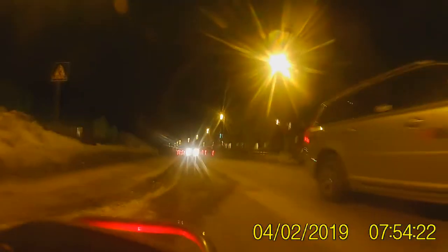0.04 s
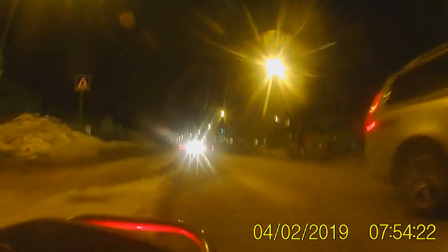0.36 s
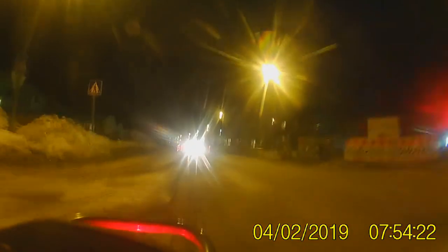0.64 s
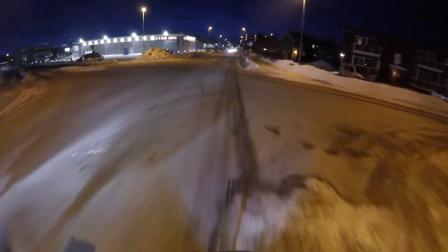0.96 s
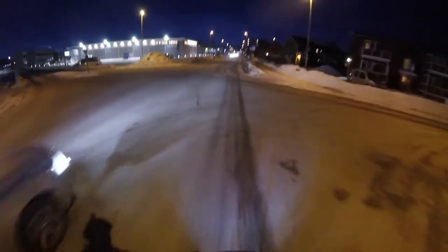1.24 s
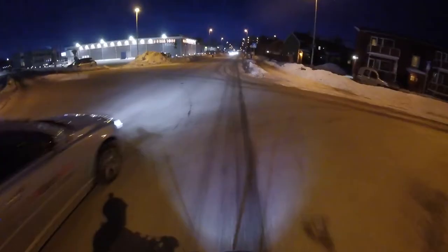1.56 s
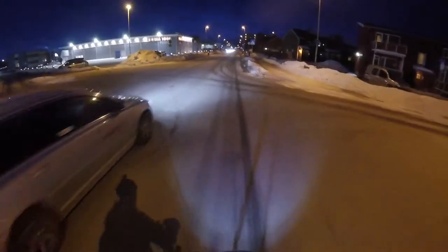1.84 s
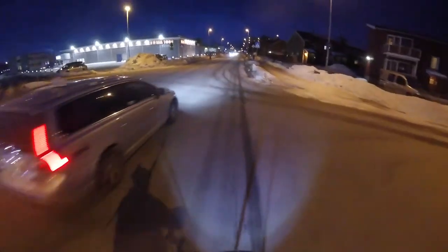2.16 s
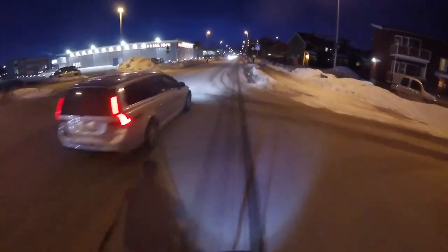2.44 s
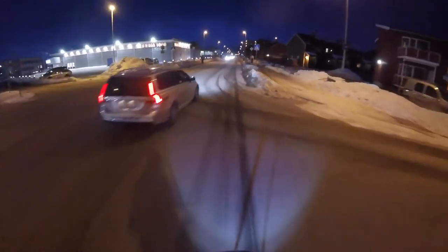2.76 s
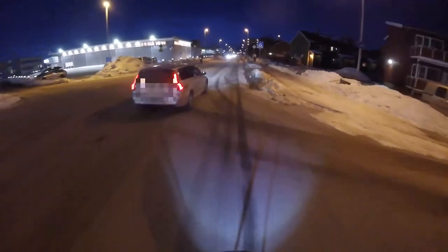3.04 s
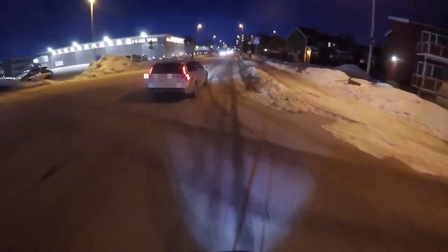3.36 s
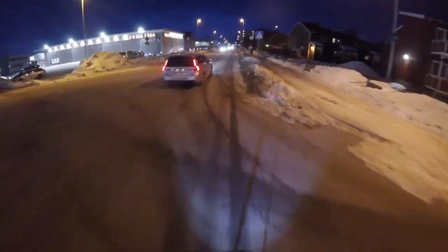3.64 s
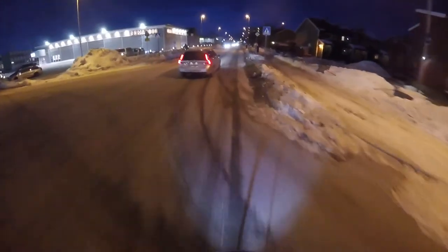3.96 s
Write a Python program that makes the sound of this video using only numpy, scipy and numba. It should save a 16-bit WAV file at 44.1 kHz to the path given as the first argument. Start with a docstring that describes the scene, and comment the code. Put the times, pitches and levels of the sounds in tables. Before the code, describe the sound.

Strong wind overloads a bicycle's microphone with harsh crackling and faint whistling. After about a second it switches abruptly to a deep, gusty rumble, with a thin hiss and a car's tyres rolling past on a snowy road.

```python
"""Night cycling on a snowy road

Two scenes are heard from a bicycle, one straight after the other. In the first, wind overloads a small
microphone: the signal slams between its limits and crackles, and the housing whistles and squeaks.
In the second, at another microphone, turbulent wind rumbles and gusts, a car's tyres roar past,
and rushing air hisses in two narrow resonances of a camera case."""
import sys
import numpy as np
from scipy.fft import rfft, irfft, next_fast_len
from scipy.io import wavfile
from scipy.ndimage import uniform_filter1d, map_coordinates
from numba import njit

SR = 44100
rng = np.random.default_rng(int(sys.argv[2]) if len(sys.argv) > 2 else 0)


def log_audio(samples):
    """Write samples as a 16-bit WAV file to the path given in sys.argv[1]."""
    # one column per channel
    frames = np.atleast_2d(samples).T
    # limit to full scale, then quantise
    limited = np.clip(frames, -1, 1)
    pcm = np.round(limited * 32767).astype(np.int16)
    wavfile.write(sys.argv[1], SR, pcm)


N = 176400
TIME = np.arange(N) / SR

# spectrum of the microphone's crackle and fizz: f/Hz, relative level/dB
CRACKLE_SPECTRUM = [(300, 7.5), (2000, -1.5), (2900, 4), (4200, 3.5), (5500, -1.5), (9500, -1),
                    (13000, -16), (16000, -19)]


def amp(db):
    """Amplitude ratio of a level in decibels."""
    return 10 ** (np.asarray(db) / 20)


def unit(x):
    """Normalisation to rms 1."""
    return x / np.sqrt(np.mean(x ** 2) + 1e-20)


def envelope(points):
    """Gain per sample, interpolated between points (t/s, level/dB)."""
    return amp(np.interp(TIME, *np.transpose(points)))


def wobble(rate):
    """Smooth random modulation: a spline through rate Gaussian knots a second."""
    return map_coordinates(rng.standard_normal(4000), [TIME * rate], mode="mirror")


def filtered(x, response):
    """Linear filtering: the spectrum of x is multiplied by a frequency response."""
    size = next_fast_len(N + SR // 2)
    return irfft(rfft(x, size) * response(np.fft.rfftfreq(size, 1 / SR)), size)[:N]


def noise(spectrum):
    """Gaussian noise of rms 1, shaped by a spectrum (f/Hz, relative level/dB)."""
    f, db = np.transpose(spectrum)
    white = rng.standard_normal(N)
    return unit(filtered(white, lambda hz: amp(np.interp(np.log(hz + 1), np.log(f), db))))


def even(x, size):
    """Division by the running rms over size samples holds the strength of a noise steady."""
    power = uniform_filter1d(uniform_filter1d(x ** 2, size), size // 2)
    return x / np.sqrt(np.abs(power) + 1e-9)


def swell(centre, length):
    """Gaussian envelope whose length, in seconds, is two standard deviations."""
    return np.exp(-2 * ((TIME - centre) / length) ** 2)


def case_hiss():
    """Resonance: rushing air excites two close modes of the case; the upper one leads in strong flow."""
    flow_levels = [(.95, -43), (1.09, -38.5), (1.12, -44), (1.155, -34.5), (1.19, -48), (1.235, -40.5),
                   (1.39, -44), (1.425, -39), (1.47, -43.5), (2.0, -43), (2.5, -47.5), (3.25, -49),
                   (3.35, -57.5), (4, -55)]  # strength of the hiss: t/s, level/dB
    hiss_spectrum = [(2500, -37), (4400, -19), (5000, -5), (5400, 2.5), (5700, 4.5), (6060, -4),
                     (6450, 2.5), (6950, -4.5), (7600, -10.5), (9500, -20.5), (12000, -69)]  # both resonances: f/Hz, relative level/dB
    ring_spectrum = [(5000, -61), (6420, 0), (8000, -60)]  # upper resonance: f/Hz, relative level/dB
    ring_exponent = 1.605
    flow = envelope(flow_levels)
    rush = flow * unit(noise(hiss_spectrum) * amp(0.23 * wobble(24.4) + 2.1 * wobble(250)))
    ring = amp(20) * flow ** ring_exponent * noise(ring_spectrum)
    return rush + ring


def tyres():
    """Rolling noise: a passing car's tyres roar on packed snow, throw up fine spray and snap grit."""
    roar_levels = [(.95, -32), (1.3, -33), (2.05, -31), (2.3, -29.5), (2.48, -32), (2.58, -33), (3.1, -34),
                   (3.22, -34.5), (3.35, -42.5), (4, -40.5)]  # the car's passage: t/s, level/dB
    roar_spectrum = [(150, 13), (500, 3), (950, 2), (1400, 4), (1750, -2), (2100, -3.5), (3000, -10),
                     (4200, -21), (7000, -39.5), (12000, -72)]  # tread on snow: f/Hz, relative level/dB
    spray_spectrum = [(2000, 2.5), (4300, -2.5), (6500, -3), (8500, -1), (9600, -5.5), (10500, -16.5),
                      (16000, -40)]  # flying snow: f/Hz, relative level/dB
    snaps = [(1.931, -33), (2.002, -31), (2.196, -32), (2.634, -35.5)]  # breaking grit: t/s, level/dB
    snap_spectrum = [(600, -2), (2000, 8), (3200, 1), (4400, -6), (5800, 5), (8000, -17), (14000, -62)]  # breaking grit: f/Hz, relative level/dB
    spray_gain, snap_s = amp(-17), 0.0033
    roar = unit(noise(roar_spectrum) * amp(1.2 * wobble(17) + 2.2 * wobble(400)))
    spray = unit(noise(spray_spectrum) * amp(0.77 * wobble(25.2) + 2.1 * wobble(800)))
    grit = sum(amp(db) * swell(t, snap_s) for t, db in snaps) * noise(snap_spectrum)
    return envelope(roar_levels) * (roar + spray_gain * spray) + grit


def gusting_wind():
    """Turbulence: rumble and rasp leap as gusts add their power; hard blasts thud and crack."""
    wind_levels = [(.95, -16.5), (1.2, -22), (1.3, -22), (1.37, -20.5), (1.6, -20), (2.4, -22), (2.7, -19),
                   (2.95, -19), (3.12, -18), (3.38, -23.5), (3.58, -25), (3.7, -17), (3.77, -26.5),
                   (3.88, -23.5), (4, -25)]  # steady wind: t/s, level/dB
    gusts = [(0.966, 0.028, -36, -29.5), (1.038, 0.017, -10.5, -25), (1.096, 0.081, -20, -27.5),
             (1.158, 0.023, -10.5, -22.5), (1.232, 0.035, -13.5, -25), (1.433, 0.02, -14, -47),
             (2.193, 0.037, -15.5, -41), (2.467, 0.056, -19, -25.5), (3.196, 0.019, -8.5, -30),
             (3.236, 0.026, -11, -22), (3.307, 0.054, -14.5, -27), (3.372, 0.014, -8, -21),
             (3.412, 0.021, -14.5, -28.5), (3.529, 0.019, -14, -27.5), (3.642, 0.049, -20.5, -24.5),
             (3.693, 0.05, -17, -25.5), (3.825, 0.041, -19, -27.5), (3.865, 0.025, -14.5, -27.5),
             (3.938, 0.017, -16, -30)]  # surges: t/s, length/s, rumble level/dB, rasp level/dB
    blasts = [(1.154, -28, -35), (3.183, -18.5, -43), (3.231, -21, -29), (3.362, -25, -39),
              (3.395, -24, -49), (3.420, -22.5, -31.5), (3.622, -25, -48)]  # short slaps of air: t/s, thud level/dB, crack level/dB
    # spectra of the wind's four parts: f/Hz, relative level/dB
    rumble_spectrum = [(10, -36), (25, -7.5), (45, 0), (90, -2.5), (170, -4.5), (260, -11.5), (400, -20.5),
                       (700, -35.5), (4000, -110)]
    rasp_spectrum = [(100, -2), (250, 5), (450, 0), (1200, -9), (2000, -17), (3000, -29), (4300, -44),
                     (5600, -31.5), (6500, -33), (7500, -35.5), (13000, -86)]
    thud_spectrum = [(100, 0), (400, 5), (1000, -3), (2000, -17), (8000, -57)]
    crack_spectrum = [(500, -7), (1900, 7), (4300, -16), (6400, -5), (8500, -31), (13000, -64)]
    rasp_gain, rumble_crest, blast_s = amp(-13), 2.6, 0.0081
    steady = envelope(wind_levels)
    rumble_power = steady ** 2 + sum((amp(db) * swell(t, length)) ** 2 for t, length, db, _ in gusts)
    rasp_power = (steady * rasp_gain) ** 2
    rasp_power += sum((amp(db) * swell(t, length)) ** 2 for t, length, _, db in gusts)
    thuds = sum(amp(db) * swell(t, blast_s) for t, db, _ in blasts) * even(noise(thud_spectrum), 400)
    cracks = sum(amp(db) * swell(t, blast_s) for t, _, db in blasts) * noise(crack_spectrum)
    flutter = amp(1.5 * wobble(45))
    rumble = unit(np.tanh(even(noise(rumble_spectrum), size=1800) * flutter / rumble_crest))
    rasp = unit(even(noise(rasp_spectrum) * amp(2 * wobble(220)), size=1800) * flutter)
    return np.sqrt(rumble_power) * rumble + np.sqrt(rasp_power) * rasp + thuds + cracks


def housing_squeaks():
    """Resonance: the microphone's housing rattles briefly in two broad bands."""
    squeaks = [(0.077, 0.014, -42.5), (0.086, 0.011, -47), (0.339, 0.019, -49), (0.383, 0.014, -38.5),
               (0.725, 0.0072, -40.5), (0.763, 0.0083, -42), (0.894, 0.0086, -46)]  # rattles: t/s, length/s, level/dB
    spectrum = [(1500, -1), (2300, 3), (2700, -30), (3750, -20), (4100, 7), (4400, -11), (4900, -27),
                (9000, -60)]  # housing resonances: f/Hz, relative level/dB
    return sum(amp(db) * swell(t, length) for t, length, db in squeaks) * noise(spectrum)


def crackles():
    """Overload distortion: the microphone sputters in short broadband bursts."""
    bursts = [(.007, 0.0082, -39.5), (.063, 0.0012, -30.5), (0.136, 0.00095, -33), (0.184, 0.0043, -46),
              (0.385, 0.0016, -42), (0.393, 0.0025, -33), (0.507, 0.0036, -41.5), (0.528, 0.0019, -41.5),
              (0.575, 0.0014, -38), (0.618, 0.0019, -40), (.670, 0.0018, -41.5), (0.743, 0.0011, -41.5),
              (.860, 0.0027, -40), (0.935, 0.0015, -29)]  # sputters: t/s, length/s, level/dB
    sputter = unit(noise(CRACKLE_SPECTRUM) * amp(1.5 * wobble(600)))
    return sum(amp(db) * swell(t, length) for t, length, db in bursts) * sputter


def slams(eddies):
    """Bipolar pressure pulses: each pushes with the eddies, reverses abruptly and dies away."""
    reversals = [(0.027, -12.5), (0.043, -5.5), (0.096, -16), (0.125, -8), (.158, -12.5), (.194, -11.5),
                 (.201, -9.5), (.255, -13), (.287, -10), (0.294, -12), (.310, -14), (0.413, -11.5),
                 (0.421, -8), (0.448, -14.5), (.477, -6.5), (0.547, -14.5), (.589, -8.5), (0.605, -11),
                 (.634, -12), (.658, -11.5)]  # pulses: t/s, envelope level before overload/dB
    rise_s, decay_s = 0.00065, 0.0041
    pressure = np.zeros(N)
    for t, db in reversals:
        lag = TIME - t
        sign = -np.sign(eddies[int((t - decay_s / 2) * SR)])
        pressure += sign * amp(db) * np.tanh(lag / rise_s) * np.exp(-np.abs(lag) / decay_s)
    return pressure


@njit
def preamplifier(pressure, corner_hz, limit):
    """AC coupling with saturation: the output follows changes, droops to zero and stays in its limits."""
    leak = np.exp(-2 * np.pi * corner_hz / SR)
    out = np.zeros(len(pressure))
    for i in range(1, len(pressure)):
        out[i] = min(limit, max(-limit, leak * out[i - 1] + pressure[i] - pressure[i - 1]))
    return out


def overloaded_wind():
    """Clipping: eddies pin the microphone at its limit, choking the housing's whistle and a fine fizz."""
    push_levels = [(0, -23.5), (.045, -14.5), (.075, -20.5), (.14, -27), (.21, -22), (.265, -27.5),
                   (.30, -23), (.35, -25), (.385, -31.5), (.425, -16.5), (.455, -27), (.52, -24),
                   (.60, -24.5), (.65, -25.5), (.70, -24), (.745, -24.5), (.82, -25), (.87, -24.5),
                   (.95, -20)]  # wind pressure: t/s, level before overload/dB
    eddy_spectrum = [(12, -6.5), (30, 4.5), (70, -1.5), (160, -3), (300, -22.5), (600, -31), (1200, -46),
                     (8000, -110)]  # turbulence: f/Hz, relative level/dB
    whistle_spectrum = [(300, -20), (700, 4), (1250, 5), (1600, -1), (2250, 2.5), (2550, -13), (2950, -15),
                        (3300, -8), (4080, -5.5), (4500, -9), (4900, -18), (10500, -28.5), (16000, -52)]  # air in the housing: f/Hz, relative level/dB
    whistle_db, fizz_gain, limit = -49, amp(-35), amp(-21.5)
    push = envelope(push_levels)
    eddies = push * even(noise(eddy_spectrum), size=1800)
    whistle = amp(whistle_db + 1.2 * wobble(58.5) + 4.5 * wobble(460)) * noise(whistle_spectrum)
    flicker = amp(8 * wobble(300) + 3.5 * wobble(40))
    fizz = push * fizz_gain * unit(flicker * noise(CRACKLE_SPECTRUM))
    pinned = np.clip(eddies + slams(eddies) + whistle + fizz, -limit, limit)
    return preamplifier(pinned, corner_hz=12, limit=float(amp(-20.3)))


def scene():
    """Superposition of the sources at each microphone; the first gives way abruptly to the second."""
    change_s, crossfade_s = 0.952, 0.0005
    first = overloaded_wind() + crackles() + housing_squeaks()
    second = gusting_wind() + tyres() + case_hiss()
    blend = np.clip((TIME - change_s) / crossfade_s, 0, 1)
    return ((1 - blend) * first + blend * second)[None]


def record(dry):
    """Band limiting: an ideal low-pass filter removes the highest treble."""
    cutoff_hz = 15700
    return filtered(dry[0], lambda hz: hz < cutoff_hz)[None]


dry = scene()
out = record(dry)
log_audio(out)
```